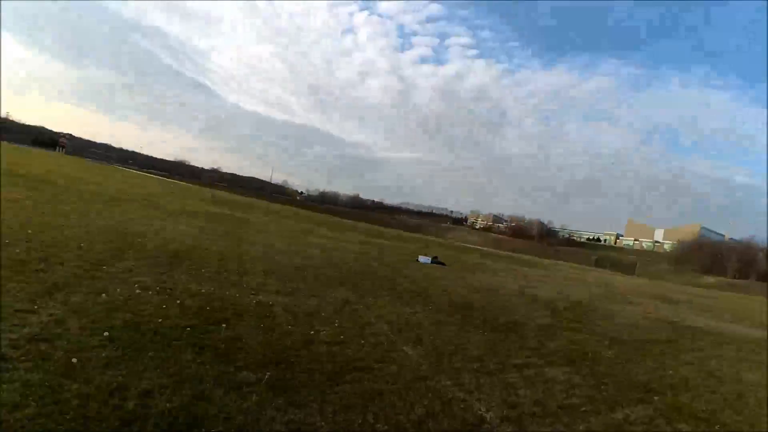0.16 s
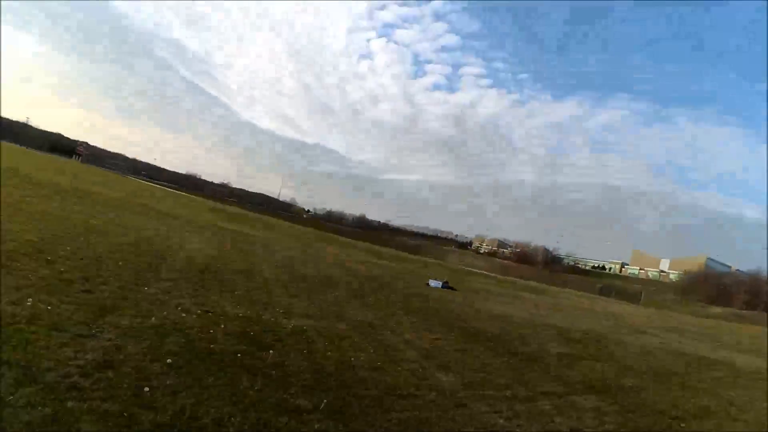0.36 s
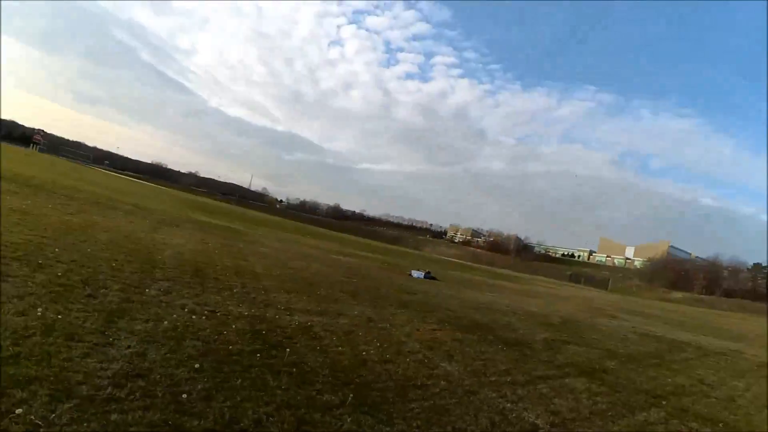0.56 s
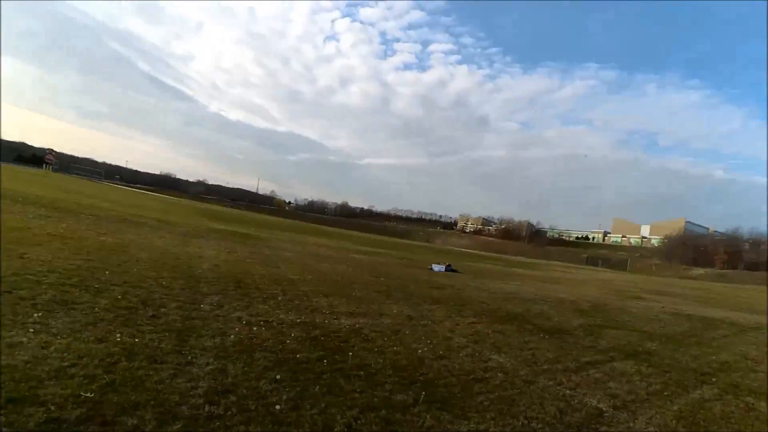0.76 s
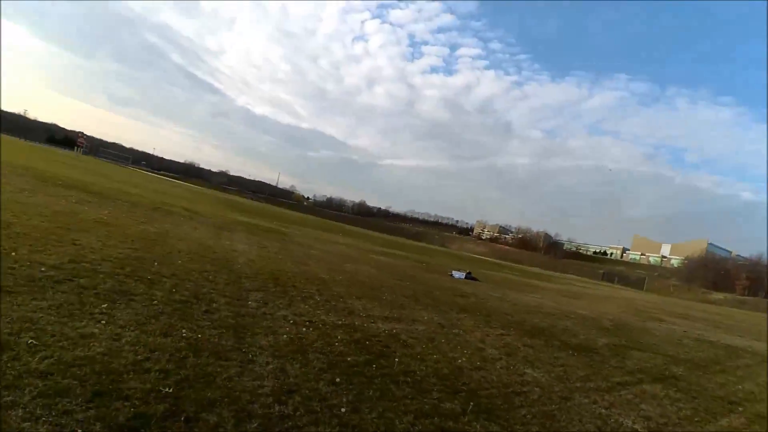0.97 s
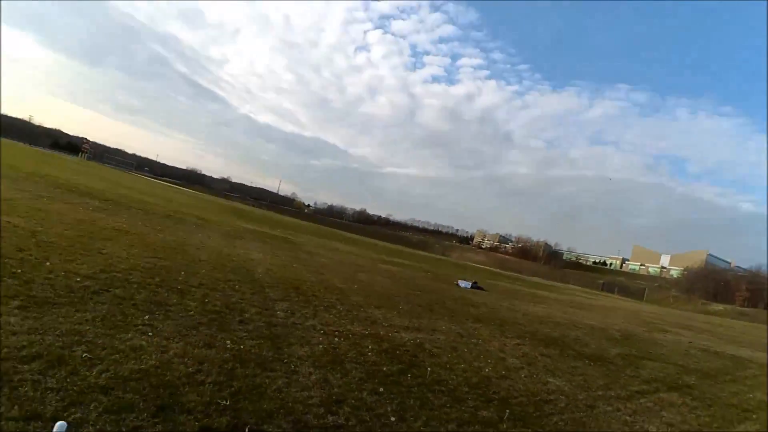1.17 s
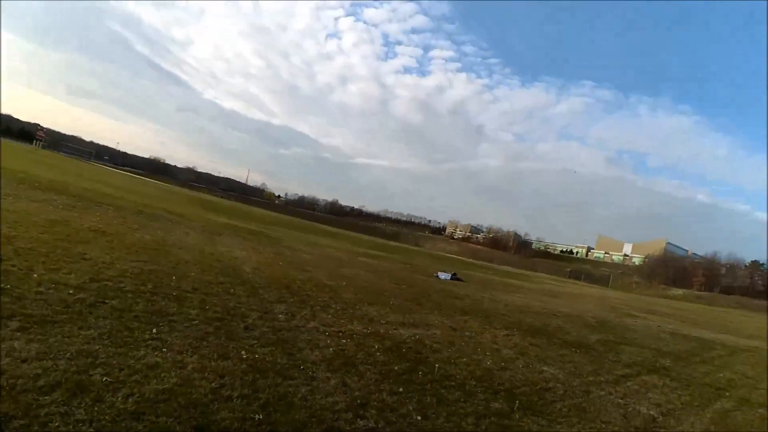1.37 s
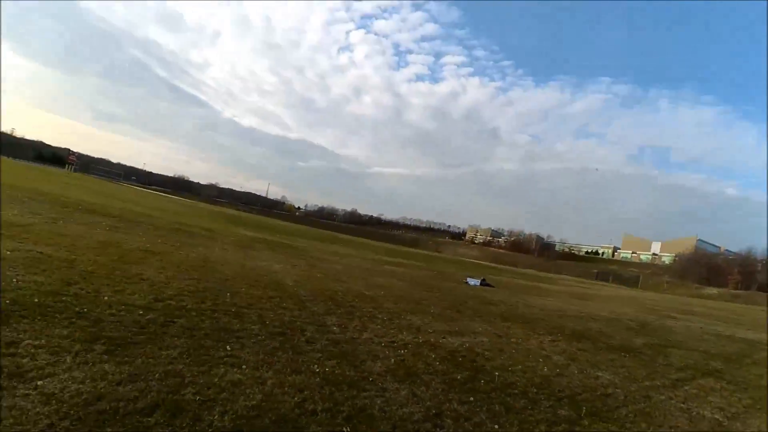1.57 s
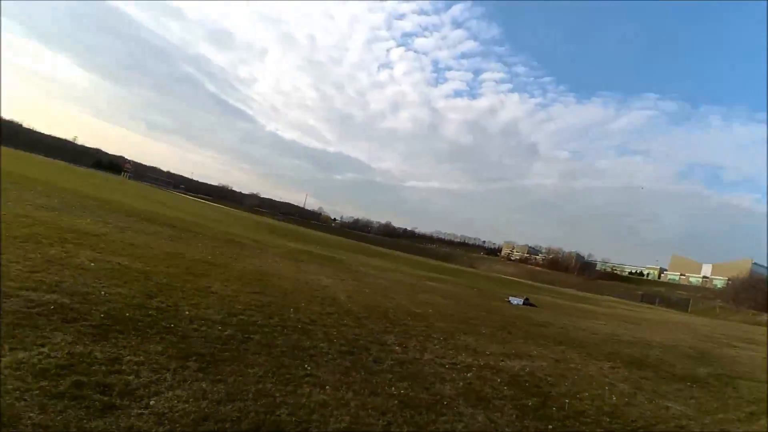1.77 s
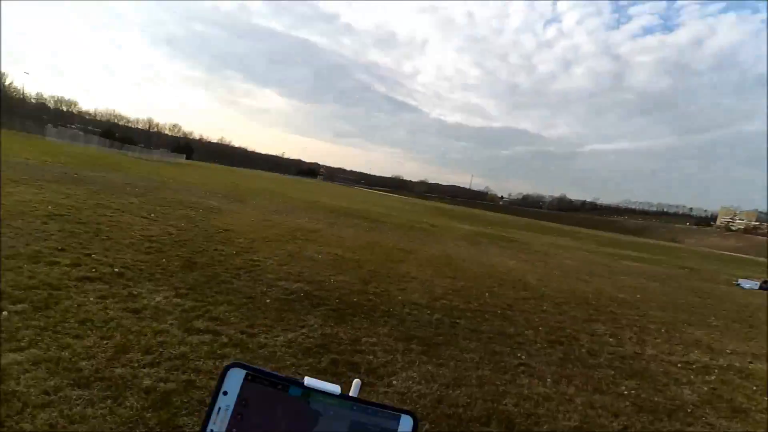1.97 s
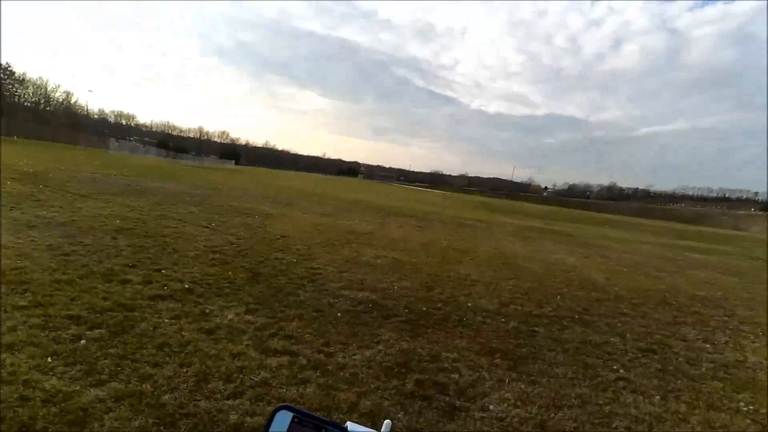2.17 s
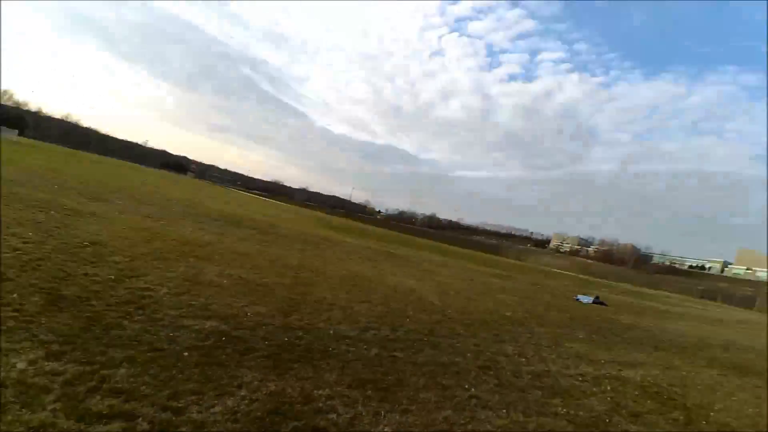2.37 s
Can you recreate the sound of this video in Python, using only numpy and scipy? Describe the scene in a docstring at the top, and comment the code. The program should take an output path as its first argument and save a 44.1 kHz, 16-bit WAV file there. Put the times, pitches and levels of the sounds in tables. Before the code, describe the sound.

Low wind buffeting surges over a carried microphone from the start, lumpy and fluttering, in an open grass field. Small dry clicks of loose gear cluster at 0.2-0.6, around 1.0, 1.3 and 1.7-2.0 seconds, above very faint grassy steps. Dull pops hit at 0.75 and 1.4-1.5. Wind lulls near 2.1, then the harshest rasping, thumping gust strikes at 2.2-2.4 and drops away.

```python
"""Wind surges and pops first: someone jogs over a grass field, carrying the microphone, and air buffets its port.
Wind is shaped noise with levels over time; pops are push-pull pulses, bursts short noise, hoots short tones.
Loose carried gear clicks: decaying modes, crunchy noise and a duller rustle.
Grass swishes as grainy noise under the strides; a faint hiss and a thin whine, both noise, lie underneath."""
import sys
import numpy as np
from scipy import signal
from scipy.fft import rfft, irfft
from scipy.io import wavfile
from scipy.ndimage import uniform_filter1d

SR = 44100
rng = np.random.default_rng(int(sys.argv[2]) if len(sys.argv) > 2 else 0)


def wrap_up_sound(samples):
    """Save the sound to the file named by the first command line argument, as 16-bit audio."""
    columns = np.atleast_2d(samples).T
    # keep every value between -1 and 1, then stretch to whole-number steps
    tamed = np.clip(columns, -1, 1)
    steps = np.round(tamed * 32767).astype(np.int16)
    wavfile.write(sys.argv[1], SR, steps)


N = 110250
TIME = np.arange(N) / SR  # [s]

# Levels below are relative: layer gains (*_GAIN_DB) add to them.
# airflow over the port: (time [s], buffeting level [dB], rough upper flutter level [dB])
AIRFLOW = [(0, -33.5, -42.5), (.02, -23, -29), (.1, -25.5, -33), (.17, -34.5, -41.5), (.23, -25, -36.5),
           (.29, -28, -41.5), (.35, -43.5, -48), (.41, -28.5, -42), (.47, -34.5, -49.5), (.53, -37.5, -45),
           (.63, -36.5, -56.5), (.69, -24, -33.5), (.75, -24, -34), (.85, -27, -32), (.9, -30.5, -45.5),
           (.96, -34.5, -42.5), (1.0, -25.5, -31.5), (1.08, -29, -33), (1.16, -27, -38.5),
           (1.26, -32.5, -42), (1.335, -30.5, -49), (1.39, -26, -30), (1.45, -21.5, -30.5),
           (1.53, -26, -40.5), (1.57, -26, -34.5), (1.66, -33.5, -41.5), (1.73, -22, -33),
           (1.8, -22.5, -34), (1.88, -28, -44.5), (1.925, -25, -51), (1.96, -39, -52), (2.02, -23, -36.5),
           (2.05, -40, -50), (2.075, -54, -59.5), (2.18, -51.5, -71), (2.215, -21, -24.5),
           (2.26, -32.5, -29), (2.3, -22, -27.5), (2.35, -21.5, -30), (2.38, -20.5, -25.5),
           (2.42, -44, -31.5), (2.435, -53, -50), (2.5, -64, -71)]
# slow pressure swell: (time [s], level [dB])
SWELL = [(0, -41), (.2, -19.5), (.42, -20), (.6, -24.5), (1.2, -19.5), (2.13, -26), (2.21, -16), (2.5, -22)]
# swell spectrum: (frequency [Hz], relative level [dB])
SWELL_COLOUR = [(10, 9), (18, 9), (35, -5.5), (60, -12), (140, -57)]
# buffeting spectrum: (frequency [Hz], relative level [dB])
BUFFET_COLOUR = [(30, -4.5), (60, 8), (100, 5), (170, -0.5), (280, -9.5), (400, -15.5), (600, -31.5),
                 (1200, -67)]
# flutter spectrum: (frequency [Hz], relative level [dB])
FLUTTER_COLOUR = [(150, 1), (300, 7.5), (450, -3), (620, -6.5), (900, -17.5), (1250, -31.5), (2000, -46),
                  (4000, -52), (15000, -57)]
# single eddies on the port: (centre time [s], level [dB], width scale [s])
POPS = [(0.018, -25, 0.0015), (0.756, -17.5, 0.00059), (1.3918, -7, 0.0012), (1.441, -10, 0.00071),
        (1.4804, -18, 0.00078), (2.234, -8.5, 0.0012), (2.2901, -4, 0.00068)]
# rasping turbulence: (centre time [s], level [dB], half length [s], centre frequency [Hz])
BURSTS = [(0.017, -33.5, 0.0025, 865), (0.044, -24.5, 0.0056, 550), (0.091, -25, 0.0056, 560),
          (0.85, -31, 0.012, 710), (1.068, -27, 0.0051, 483), (1.56, -30.5, 0.011, 634),
          (1.992, -23.5, 0.0024, 362), (2.037, -21, 0.003, 440), (2.221, -25, 0.0036, 587),
          (2.239, -18.5, 0.0045, 790), (2.279, -20.5, 0.0016, 390), (2.296, -12, 0.0043, 552),
          (2.307, -15.5, 0.0092, 424), (2.324, -17, 0.0022, 385), (2.337, -13, 0.0034, 420),
          (2.371, -15.5, 0.0055, 534), (2.418, -22, 0.0033, 418)]
# burst spectrum: (multiple of centre frequency [ratio], relative level [dB])
BURST_COLOUR = [(.25, -2.5), (.7, 8.5), (1.3, -2), (2.3, -20), (4, -41), (8, -49.5), (28, -60.5)]
# vortex tones: (centre time [s], envelope level [dB], half length [s], frequency [Hz])
HOOTS = [(0.384, -33, 0.0038, 530), (0.404, -25.5, 0.006, 366), (0.427, -28, 0.0048, 250),
         (0.465, -17, 0.0037, 164), (2.052, -27, 0.0066, 457)]
# loose gear clicks: (onset time [s], level [dB], spectral tilt [dB/octave])
CLICKS = [(0.216, -44, -2), (0.262, -34, -3), (0.271, -30, -3), (0.317, -21.5, 3), (0.3332, -34.5, 6),
          (0.447, -42, 5.5), (0.498, -34.5, -5), (0.501, -35.5, 0), (0.533, -43, 4.5), (0.5731, -31.5, -3),
          (0.5954, -40.5, 4.5), (0.93, -46, -3), (0.97, -37, -2), (0.976, -25.5, -2.5), (1.007, -25.5, 1.5),
          (1.0522, -35, -4.5), (1.154, -44.5, 3.5), (1.246, -41.5, 3.5), (1.284, -35, -5),
          (1.305, -37.5, 1.5), (1.64, -45.5, 1), (1.652, -41.5, -2.5), (1.684, -37.5, -4.5),
          (1.688, -33, -1), (1.7469, -27, 2), (1.812, -41, -1.5), (1.84, -52, -6), (2.0135, -36, -4),
          (2.025, -40.5, -0.5), (2.3981, -36, 5), (2.41, -39.5, -4.5), (2.445, -37.5, -1)]
# gear resonances before random spread: (frequency [Hz], level [dB], 60 dB decay time [s])
GEAR_MODES = [(1587, -4, 0.0041), (2860, -14.5, 0.0049), (4160, -27, 0.0013), (5930, -10, 0.006),
              (9330, -7.5, 0.0015)]
# click noise spectrum before random spread: (frequency [Hz], relative level [dB])
CLICK_COLOUR = [(500, -17), (1100, 1.5), (1600, 10.5), (2200, -3.5), (3000, 8.5), (4500, 0), (6200, 1.5),
                (7800, -7.5), (12000, -16), (15500, -22)]
# feet brushing the grass: (loudest time [s], level [dB])
STEPS = [(0.272, -64), (0.36, -62), (0.51, -54), (0.597, -55), (0.982, -60), (1.035, -63), (1.313, -54.5),
         (1.767, -53.5), (1.84, -62.5), (2.012, -56), (2.485, -58)]
# grass and gear rustle spectrum: (frequency [Hz], relative level [dB])
GRASS_COLOUR = [(500, 10), (1000, 1), (1600, 10), (2300, 3.5), (3200, 0.5), (5000, -9), (9000, -13.5),
                (15000, -23)]
# hiss spectrum: (frequency [Hz], relative level [dB])
HISS_COLOUR = [(200, 8), (600, 4), (1000, 4), (1600, 2), (2200, -8.5), (3200, -6.5), (5000, -10),
               (10000, -15.5), (15000, -29)]
# thin whine: (time [s], level [dB])
WHINE = [(1.65, -73), (1.8, -66), (1.94, -81), (2.07, -68.5), (2.09, -80)]

SWELL_GAIN_DB, BUFFET_GAIN_DB, FLUTTER_GAIN_DB, BURST_GAIN_DB = -3, 0.5, 2, -1
WIND_FLICKER_HZ, BUFFET_ROUGH_DB, FLUTTER_ROUGH_DB = 68.6, 3, 7
CRACK_GAIN_DB, CRUNCH_GAIN_DB = 2, -6
CLICK_RISE_S, CLICK_DECAY_S = 0.0004, 0.0017
RATTLE_DB, RATTLE_DECAY_S = -11, 0.009  # tail, relative to the click's fast decay
RATTLE_FLICKER_HZ, RATTLE_GRAIN_DB = 500, 4
MODE_SPREAD_DB, MODE_DETUNE_RATIO, CLICK_SPREAD_DB = 2, 0.06, 2  # standard deviations
TILT_PIVOT_HZ = 4500
SCUFF_GAIN_DB, SCUFF_DECAY_S = -24.5, 0.022  # duller rustle trailing each click
STEP_RISE_S, STEP_DECAY_S = 0.02, 0.025
GRASS_GAIN_DB, GRASS_FLICKER_HZ, GRASS_GRAIN_DB = 1, 750, 8
HISS_DB = -62.5
HISS_BAND_HZ, HISS_BAND_WIDTH_HZ, HISS_BAND_DB = 5810, 350, -80.5
WHINE_HZ, WHINE_WIDTH_HZ = 5533, 90
CUTOFF_HZ = 15300
SNIPPET_SAMPLES = SR // 8  # buffer for one click or burst


def from_db(db):
    """Decibels to amplitude gain."""
    return 10 ** (np.asarray(db) / 20)


def rms_one(x):
    """Scale to unit rms."""
    return x / np.sqrt(np.mean(x ** 2) + 1e-20)


def in_time(rows):
    """One interpolated curve per column after the time column."""
    time_s, *columns = np.transpose(rows)
    return [np.interp(TIME, time_s, column) for column in columns]


def noise(colour, tilt_db_per_octave=0, size=N):
    """Unit-rms noise with the given spectrum and tilt, falling 20 dB/octave outside the table."""
    octave = np.log2(np.maximum(np.fft.rfftfreq(size, 1 / SR), 1))
    hz, level_db = np.transpose(colour)
    table_octave = np.log2(hz)
    octaves_outside = np.abs(octave - np.clip(octave, table_octave[0], table_octave[-1]))
    spectrum_db = np.interp(octave, table_octave, level_db)
    gain = from_db(spectrum_db + tilt_db_per_octave * octave - 20 * octaves_outside)
    return rms_one(irfft(rfft(rng.standard_normal(size)) * gain, size))


def narrow_noise(hz, width_hz):
    """Unit-rms noise in a narrow band."""
    edges_hz = [hz - width_hz / 2, hz + width_hz / 2]
    band = signal.butter(2, edges_hz, "band", fs=SR, output="sos")
    return rms_one(signal.sosfilt(band, rng.standard_normal(N)))


def evened(x, span_s):
    """Noise divided by its twice-smoothed local rms, to take out chance swells."""
    size = max(int(span_s * SR), 2)
    power = uniform_filter1d(uniform_filter1d(x ** 2, size), size)
    return x / np.sqrt(power + 1e-9)


def flicker(cutoff_hz, depth_db, size=N):
    """Random gain of unit rms, wavering in dB with low-passed noise."""
    lowpass = signal.butter(2, cutoff_hz, fs=SR, output="sos")
    slow = signal.sosfilt(lowpass, rng.standard_normal(2 * size))[size:]  # drop the filter's start
    return rms_one(from_db(depth_db * np.clip(rms_one(slow), -2, 2)))


def wind():
    """Air on the port: slow pressure swell, lumpy low buffeting and rougher upper flutter."""
    buffet_db, flutter_db = in_time(AIRFLOW)
    swell_db, = in_time(SWELL)
    swell = from_db(SWELL_GAIN_DB + swell_db) * evened(noise(SWELL_COLOUR), 0.06)
    lumps = evened(noise(BUFFET_COLOUR), 0.017) * flicker(WIND_FLICKER_HZ, BUFFET_ROUGH_DB)
    buffet = from_db(BUFFET_GAIN_DB + buffet_db) * lumps
    rough = noise(FLUTTER_COLOUR) * flicker(WIND_FLICKER_HZ, FLUTTER_ROUGH_DB)
    flutter = from_db(FLUTTER_GAIN_DB + flutter_db) * evened(rough, 0.085)
    return swell + buffet + flutter


def pops():
    """A passing eddy pushes, then pulls on the port."""
    out = np.zeros(N)
    for centre_s, level_db, width_s in POPS:
        u = (TIME - centre_s) / width_s
        out -= from_db(level_db) * 2 * u / (1 + u * u / 2) ** 3
    return out


def bursts():
    """Fast air rasps across the port: band-shaped noise under a short Gaussian envelope."""
    size = SNIPPET_SAMPLES
    out = np.zeros(N + SR)
    offset_s = (np.arange(size) - size // 2) / SR
    for centre_s, level_db, half_s, centre_hz in BURSTS:
        colour = [(ratio * centre_hz, db) for ratio, db in BURST_COLOUR]
        rasp = evened(noise(colour, size=size), 0.007)
        envelope = np.exp(-(offset_s / half_s) ** 2)
        start = int(centre_s * SR)
        out[start:start + size] += from_db(BURST_GAIN_DB + level_db) * envelope * rasp
    return out[size // 2:size // 2 + N]  # puts each centre at its time


def hoots():
    """Regular vortex shedding: a brief steady-pitched tone under a Gaussian envelope."""
    out = np.zeros(N)
    for centre_s, level_db, half_s, hz in HOOTS:
        envelope = np.exp(-((TIME - centre_s) / half_s) ** 2)
        out += from_db(level_db) * envelope * np.sin(2 * np.pi * hz * (centre_s - TIME))
    return out


def gear_crack(age_s, tilt_db_per_octave):
    """A small hard part struck at a new spot: decaying modes, their levels and pitches randomised."""
    crack = np.zeros(len(age_s))
    for k, (hz, level_db, t60_s) in enumerate(GEAR_MODES):
        tilt_db = tilt_db_per_octave * np.log2(hz / TILT_PIVOT_HZ)
        strength = from_db(level_db + tilt_db + rng.normal(0, MODE_SPREAD_DB))
        pitch_hz = hz * (1 + rng.normal(0, MODE_DETUNE_RATIO))
        decay = np.exp(-np.log(1000) * age_s / t60_s)
        crack += (-1) ** k * strength * decay * np.sin(2 * np.pi * pitch_hz * age_s)
    return crack


def gear():
    """Loose gear clicks: a modal crack, crunchy noise with a rattling tail, and a duller scuff."""
    size = SNIPPET_SAMPLES
    out = np.zeros(N + SR)
    age_s = np.arange(size) / SR
    rise = 1 - np.exp(-age_s / CLICK_RISE_S)
    tail = from_db(RATTLE_DB) * np.exp(-age_s / RATTLE_DECAY_S)
    envelope = rise * (np.exp(-age_s / CLICK_DECAY_S) + tail)
    for onset_s, level_db, tilt in CLICKS:
        crack = from_db(CRACK_GAIN_DB) * gear_crack(age_s, tilt)
        colour = [(hz, db + rng.normal(0, CLICK_SPREAD_DB)) for hz, db in CLICK_COLOUR]
        grains = noise(colour, tilt, size) * flicker(RATTLE_FLICKER_HZ, RATTLE_GRAIN_DB, size)
        crunch = from_db(CRUNCH_GAIN_DB) * envelope * evened(grains, 0.0017)
        scuff_level = from_db(SCUFF_GAIN_DB) * np.exp(-age_s / SCUFF_DECAY_S)
        scuff = scuff_level * noise(GRASS_COLOUR, size=size)
        start = int(onset_s * SR)
        out[start:start + size] += from_db(level_db) * (crack + crunch + scuff)
    return out[:N]


def grass():
    """Feet brush the grass: grainy noise rises and dies exponentially around each step."""
    level = np.zeros(N)
    for loudest_s, level_db in STEPS:
        rise = (loudest_s - TIME) / STEP_RISE_S
        decay = (TIME - loudest_s) / STEP_DECAY_S
        level += from_db(level_db) * np.exp(-np.maximum(rise, decay))
    swish = noise(GRASS_COLOUR) * flicker(GRASS_FLICKER_HZ, GRASS_GRAIN_DB)
    return from_db(GRASS_GAIN_DB) * level * swish


def hiss():
    """Steady faint noise with a narrow high band."""
    band = from_db(HISS_BAND_DB) * narrow_noise(HISS_BAND_HZ, HISS_BAND_WIDTH_HZ)
    return from_db(HISS_DB) * noise(HISS_COLOUR) + band


def whine():
    """Thin whine: very narrow noise whose level rises and falls."""
    level_db, = in_time(WHINE)
    return from_db(level_db) * narrow_noise(WHINE_HZ, WHINE_WIDTH_HZ)


def scene():
    """Sum of all sources; one microphone feeds both channels."""
    air = wind() + pops() + bursts() + hoots()
    mono = air + gear() + grass() + hiss() + whine()
    return np.tile(mono, (2, 1))


def record(dry):
    """Steep elliptic low-pass cuts the top."""
    lowpass = signal.ellip(10, 0.1, 80, CUTOFF_HZ, fs=SR, output="sos")
    return signal.sosfilt(lowpass, dry)


dry = scene()
out = record(dry)
wrap_up_sound(out)
```